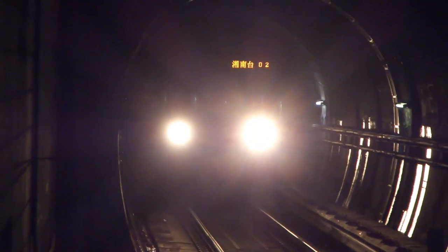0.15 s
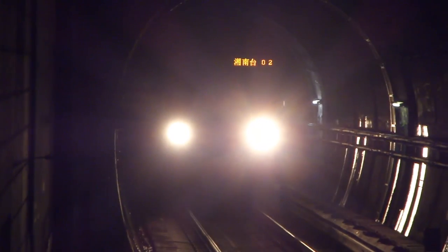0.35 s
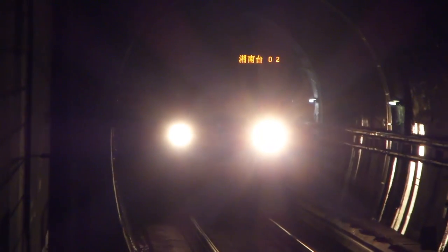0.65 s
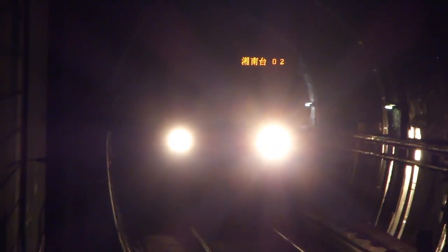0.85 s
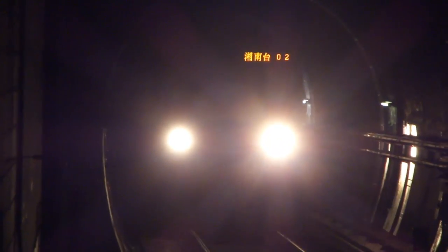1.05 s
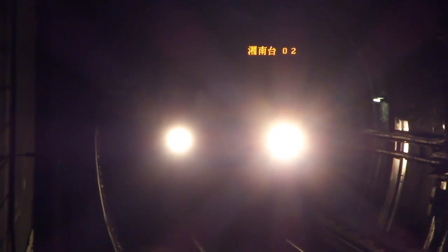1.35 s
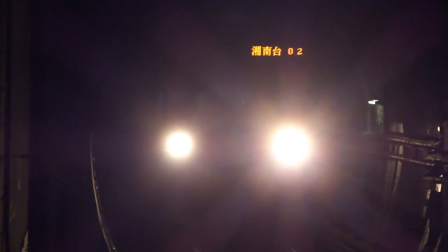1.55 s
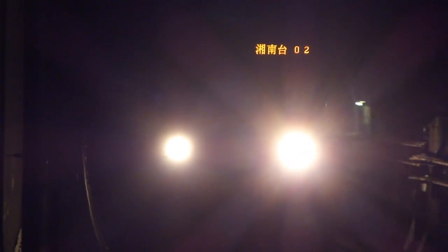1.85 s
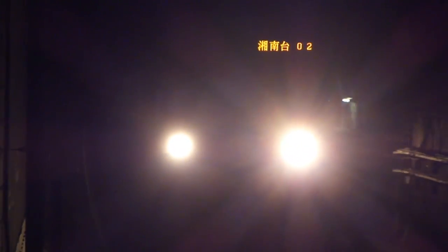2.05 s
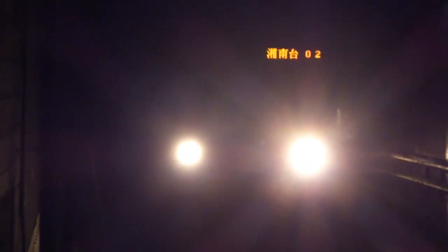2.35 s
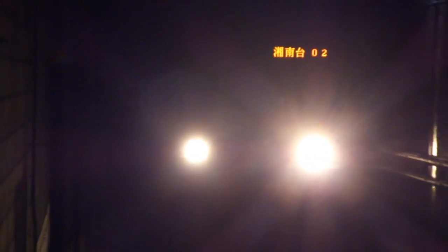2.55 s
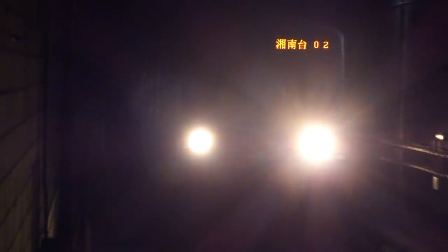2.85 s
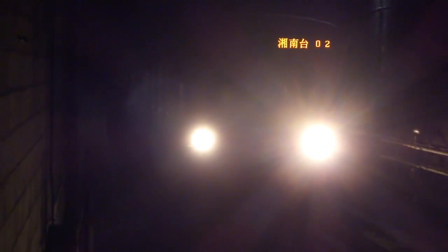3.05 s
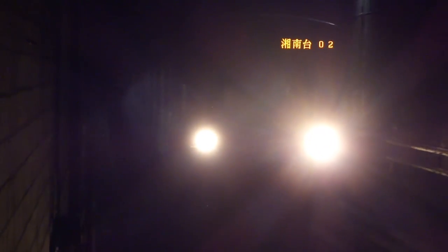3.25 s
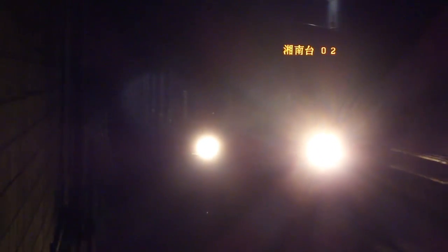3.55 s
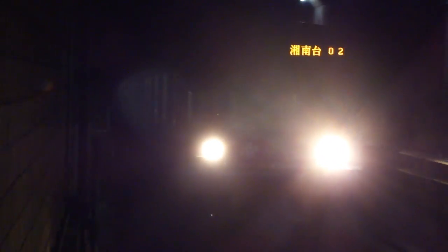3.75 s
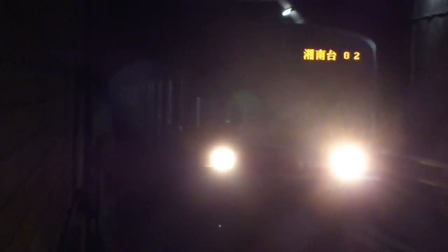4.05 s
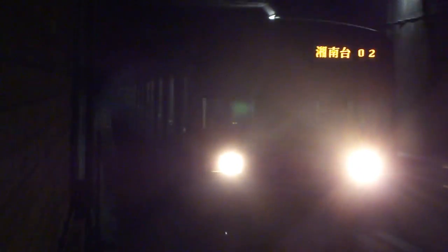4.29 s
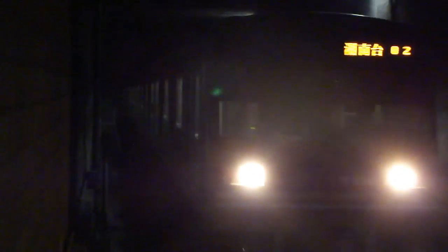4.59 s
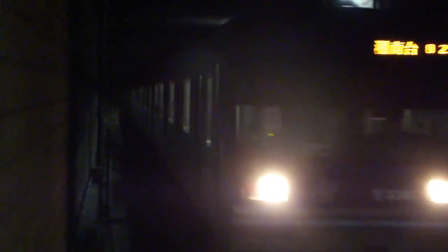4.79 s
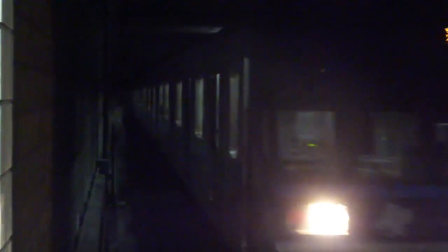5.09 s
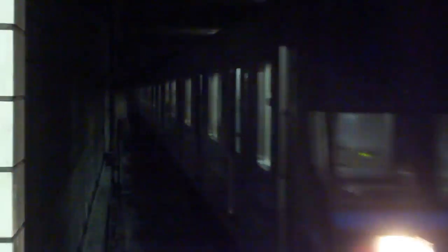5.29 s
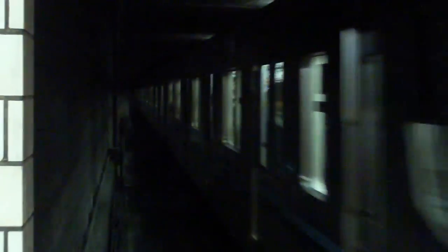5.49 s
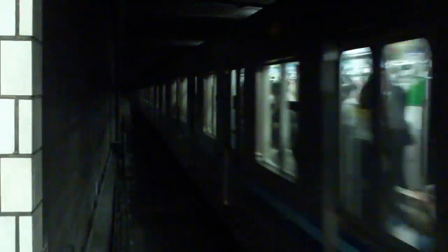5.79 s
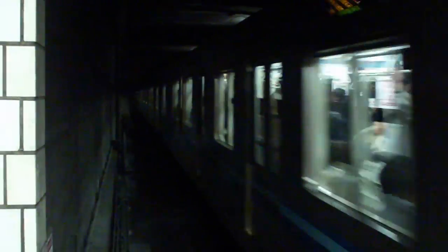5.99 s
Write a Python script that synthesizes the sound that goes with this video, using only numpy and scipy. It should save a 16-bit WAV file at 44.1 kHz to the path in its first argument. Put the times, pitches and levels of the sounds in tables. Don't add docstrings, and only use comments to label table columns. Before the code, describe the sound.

Hollow rumbling and humming of an approaching underground train, gusty wind thumps, growing metallic hiss and pulsing high wheel squeals close by at the end.

```python
import sys
import numpy as np
from scipy import signal
from scipy.fft import rfft, irfft, next_fast_len
from scipy.io import wavfile
from scipy.ndimage import uniform_filter1d

SR = 44100
rng = np.random.default_rng(int(sys.argv[2]) if len(sys.argv) > 2 else 0)


def linear_from_db(decibels):
    return 10 ** (np.asarray(decibels, float) / 20)


def store_pcm(level_fs):
    pcm = np.round(np.clip(level_fs, -1, 1) * 32767).astype(np.int16)
    wavfile.write(sys.argv[1], SR, np.atleast_2d(pcm).T)


N = 270333


def in_time(rows):
    s, *columns = np.transpose(rows)
    return [np.interp(np.arange(N) / SR, s, c) for c in columns]


def ramp(start_s, length_s):
    return np.clip((np.arange(N) / SR - start_s) / length_s, 0, 1)


def rms_one(x):
    return x / np.sqrt(np.mean(np.abs(x) ** 2) + 1e-20)


def drift(rate_hz):
    r = np.exp(-80 * np.pi * rate_hz / SR)
    noise = rng.standard_normal(N // 40 + 2002)
    slow = signal.lfilter([1], [1, -2 * r, r * r], noise)[2000:]
    return np.interp(np.arange(N) / 40, np.arange(len(slow)), rms_one(slow))


def coloured(spectrum, low_hz, high_hz, rings=()):
    size = next_fast_len(N)
    hz = np.arange(size // 2 + 1) * SR / size + 1e-3
    points = np.array(spectrum)
    gain = linear_from_db(np.interp(np.log(hz), np.log(points[:, 0]), points[:, 1]))
    resonance = sum(linear_from_db(db) ** 2 / (1 + (2 * (hz - f) / w) ** 2) for f, w, db in rings)
    gain = gain * np.sqrt(1 + resonance)
    gain = gain / np.sqrt((1 + (low_hz / hz) ** 10) * (1 + (hz / high_hz) ** 10))
    noise = rng.standard_normal((2, size))
    return rms_one(irfft(gain * rfft(noise), size)[:, :N])


def ringing(centre_hz, width_hz):
    r = np.exp(-np.pi * width_hz / SR)
    slow = rng.standard_normal((2, N)) + 1j * rng.standard_normal((2, N))
    slow = signal.lfilter([1], [1, -2 * r, r * r], slow)
    carrier = np.exp(2j * np.pi * np.cumsum(centre_hz) / SR)
    return rms_one(np.real(slow * carrier))


def stereo(pair, alike, left_db, left_lag):
    shared, walls = pair
    size = next_fast_len(N)
    spectrum = rfft(shared, size)
    delay = np.exp(-2j * np.pi * np.arange(len(spectrum)) / size * left_lag)
    late = irfft(spectrum * delay, size)[:N]
    alike = np.clip(alike, 0, 1)
    echoes = np.array([walls, np.roll(walls, 9000)])
    both = np.sqrt(alike) * np.array([late, shared]) + np.sqrt(1 - alike) * echoes
    return both * linear_from_db([[left_db / 2], [-left_db / 2]])


def in_bend():
    return ramp(3.45, .15) - ramp(4.78, .05)


def nearness_db():
    speed_m_per_s, abreast_s, side_m = 10.1, 5.98, 6.35
    along_m = speed_m_per_s * (np.arange(N) / SR - abreast_s)
    return -10 * np.log10(1 + (along_m / side_m) ** 2)


# (time [s], rail level [dB], wheel level over the rail [dB])
ROLLING = [(0, -21, -13), (.22, -18.5, -11.5), (.72, -17.5, -12.5), (.84, -20.5, -13), (1.05, -22, -10.5),
           (1.18, -18, -12.5), (1.5, -20, -11.5), (1.95, -18.5, -12.5), (2.45, -19.5, -13),
           (2.65, -19.5, -8), (3.28, -18.5, -12), (3.55, -19, -15), (3.82, -17.5, -12.5),
           (4.08, -17.5, -13), (4.35, -15.5, -9.5), (4.65, -25, -9), (4.9, -18, -10), (6.13, -18.5, -11.5)]
# (frequency [Hz], density [dB per Hz])
ROLLING_COLOUR = [(24, -82), (40, -57.5), (114, -25), (155, -28.5), (196, -15), (281, -16.5), (325, -10.5),
                  (397, -11), (802, -4.5), (1240, -12), (2130, -14), (2420, -15.5), (3000, -37),
                  (3900, -60), (6600, -120)]
# (frequency [Hz], width [Hz], level over the roar [dB])
RAIL_MODES = [(474.7, 4.8, 6.5), (648, 28, -8), (1090, 130, 0.5), (1882, 243, 4.5), (2380, 74, -8.5)]
# (time [s], centre [Hz], level over the rail band [dB])
RAIL_HUM = [(0, 800, -5), (.5, 845, -2.5), (.75, 800, 1), (1.3, 830, -5), (2.3, 826, -7), (2.55, 787, 0.5),
            (3.3, 783, -4), (3.6, 766, -2), (4.2, 772, -8), (4.5, 790.6, -0.5), (4.85, 816.8, -2.5),
            (5.25, 816, -6), (5.45, 793, -5.5), (5.9, 789.3, -8), (6.13, 822, -4)]


def roar():
    rail_db, wheel_db = in_time(ROLLING)
    hum_hz, hum_db = in_time(RAIL_HUM)
    together_db = 0.77 * drift(19.0)

    low_db = -26 + 0.48 * (rail_db - rail_db.mean()) - rail_db
    low = stereo(coloured(ROLLING_COLOUR, 110, 620, RAIL_MODES), alike=0.99, left_db=-3.5, left_lag=.8)
    low = low * linear_from_db(low_db + 0.32 * drift(1.8))

    rail = coloured(ROLLING_COLOUR, 474, 972, RAIL_MODES) * linear_from_db(-3.5 + 0.72 * drift(13))
    hum = ringing(hum_hz, width_hz=75) * linear_from_db(hum_db - 4.5 + 1.5 * drift(5))
    rail = stereo(rail + hum, alike=1.0, left_db=-3.5, left_lag=0.39)

    upper_db = -3 - 4.5 * ramp(3.33, 0.15)
    upper = stereo(coloured(ROLLING_COLOUR, 949, 1233, RAIL_MODES), alike=0.97, left_db=-4.5, left_lag=1.0)
    upper = upper * linear_from_db(upper_db + together_db + 1.0 * drift(8.2))

    wheel_db = wheel_db - 0.1 + 2 * ramp(5.15, 0.11)
    wheel = stereo(coloured(ROLLING_COLOUR, 1360, 4000, RAIL_MODES), alike=0.93, left_db=-5.0, left_lag=0.37)
    wheel = wheel * linear_from_db(wheel_db + together_db + 0.18 * drift(15))
    return linear_from_db(rail_db + 0.12) * (low + rail + upper + wheel)


def squeal(level_db, centre_hz, broad_hz, wander_hz, alike):
    sound = ringing(centre_hz, broad_hz)
    share_db = np.clip(.4 * (level_db - level_db.max()), -10, 0) - 6
    for rate_hz in (7, 11):
        whistle = ringing(centre_hz + wander_hz * drift(rate_hz), 200)
        sound = sound + whistle * linear_from_db(share_db + 3.5 * drift(14))
    return linear_from_db(level_db) * stereo(rms_one(sound), alike=alike, left_db=-.8, left_lag=1.4)


# (time [s], peak level [dB], starting pitch [Hz])
WHEEL_TURNS = [(2.509, -52, 7510), (2.69, -58, 7560), (2.87, -52, 7600), (3.04, -58, 7680),
               (4.905, -41.5, 7330), (5.1, -39.5, 7510), (5.305, -38.5, 7660), (5.505, -42, 7520),
               (5.71, -35.5, 7670), (5.911, -36, 7810), (6.11, -42.5, 7830)]


def wheel_turns(steady_db):
    rise_s, hold_s, fall_db_per_s, climb_hz_per_s = .015, 0.061, 125, 2000
    t = np.arange(N) / SR
    power = linear_from_db(2 * steady_db)
    hz = np.full(N, 7760.)
    for s, peak_db, start_hz in WHEEL_TURNS:
        fall_db = fall_db_per_s * np.maximum(t - s - hold_s, 0)
        power = power + (ramp(s - rise_s, rise_s) * linear_from_db(peak_db - fall_db)) ** 2
        during = (t > s - rise_s) & (t < s + .2)
        hz = np.where(during, start_hz + climb_hz_per_s * (t - s), hz)
    return 10 * np.log10(power), hz


# (time [s], level [dB])
FLANGE_PRESSURE = [(0.0, -54), (0.03, -64.5), (0.94, -64), (1.25, -54), (1.86, -55.5), (3.16, -44.5),
                   (3.45, -54), (4.46, -48), (4.71, -52), (4.8, -38.5), (5.0, -36.5), (5.16, -37),
                   (5.53, -37), (5.63, -31.5), (5.77, -38), (5.82, -32), (5.89, -35), (6.13, -34.5)]


def flanges():
    high_db, = in_time(FLANGE_PRESSURE)
    under_peak_db = high_db - high_db.max()
    bend = in_bend()
    high_hz = 9520 + (8780 - 9520) * bend
    low_db, low_hz = wheel_turns(-43 + under_peak_db + 2.9 * bend)
    low = ramp(1.8, 1.0) * squeal(low_db, low_hz, broad_hz=820, wander_hz=170, alike=.6)
    high = squeal(high_db + 0.41 + 1.3 * drift(12), high_hz, broad_hz=1370, wander_hz=286, alike=.45)
    over_db = high_db - 17.5 + 0.27 * under_peak_db + 8 * drift(6)
    over = linear_from_db(over_db) * ringing(np.full(N, 11000.), width_hz=500)
    return low + high + over


# (time [s], level [dB], pitch [Hz])
DISC_RING = [
    (0, -71, 2300),
    (5.05, -67.5, 2238),
    (5.2, -38, 2316),
    (5.35, -32.5, 2380),
    (5.48, -34, 2265),
    (5.65, -36, 2136),
    (5.8, -54, 1990),
    (6.13, -73, 2100),
]


def bogie():
    level_db, hz = in_time(DISC_RING)
    return linear_from_db(level_db) * stereo(ringing(hz, width_hz=230), alike=.9, left_db=-6.0, left_lag=.4)


# (frequency [Hz], density [dB per Hz])
SLIDING_COLOUR = [(2800, -7), (3300, -3), (4500, -5.5), (5600, -4), (6600, -1.5), (7600, -6), (8600, -11.5),
                  (10000, -10), (11500, -26)]


def hiss():
    near_db, wheel_db = nearness_db(), sum(in_time(ROLLING))
    level_db = wheel_db.mean() + 0.77 * (wheel_db - wheel_db.mean()) - 14.5
    level_db = level_db + 0.52 * near_db
    level_db = level_db + 1.7 * ramp(5.15, .12)
    level_db = level_db + 1.5 * in_bend()
    lower_db = -11 - 0.41 * near_db
    lower = stereo(coloured(SLIDING_COLOUR, 2300, 5100), alike=0.58, left_db=-3.5, left_lag=0.24)
    upper = stereo(coloured(SLIDING_COLOUR, 4670, 15000), alike=0.62, left_db=-0.2, left_lag=0.81)
    return linear_from_db(level_db + 1.1 * drift(8.9)) * (linear_from_db(lower_db + 5.0) * lower + linear_from_db(1.5) * upper)


# (time [s], peak level [dB], pitch [Hz], length [s])
FLANGE_CHIRPS = [
    (2.204, -77, 13500, 0.04),
    (2.577, -73, 13670, 0.04),
    (3.2695, -86, 13800, 0.038),
    (3.905, -78, 12700, 0.04),
    (4.7636, -74, 13300, 0.04),
    (5.596, -65, 13400, 0.032),
    (5.8052, -66, 13100, 0.051),
]


def chirps():
    t, out = np.arange(N) / SR, 0
    noise = ringing(np.zeros(N), width_hz=120)
    for s, peak_db, hz, length_s in FLANGE_CHIRPS:
        shape = np.sin(np.pi * np.clip((t - s + .01) / length_s, 0, 1)) ** 2
        out = out + linear_from_db(peak_db + 3.0) * shape * noise[0] * np.sin(2 * np.pi * hz * t)
    return out


# (middle [s], half length [s], peak level [dB], left over right [dB])
AIR_PUFFS = [(0, 0.056, -19, -3.5), (0.347, 0.066, -25.5, -7), (0.562, 0.054, -22, -4),
             (0.844, 0.09, -20.5, -6.5), (0.988, 0.038, -25.5, -9), (1.308, 0.014, -18.5, 0),
             (1.42, .045, -18, -3), (1.54, 0.046, -23, 0), (1.722, .04, -18, 4), (1.79, 0.029, -24, -2),
             (1.922, 0.06, -26.5, -3), (2.093, 0.043, -17.5, -2.5), (2.216, 0.038, -14.5, -1),
             (2.424, 0.059, -18, 0.5), (2.672, 0.13, -26.5, 2), (3.064, 0.13, -30, -10),
             (3.462, 0.11, -22, -5), (3.676, 0.24, -26.5, 0), (3.885, 0.025, -16, -2),
             (4.063, 0.14, -21.5, -0.5), (4.49, 0.088, -20.5, -3), (4.6, 0.11, -20, -1.5),
             (4.784, 0.088, -20, -7), (5.093, 0.035, -20, -10), (5.19, 0.12, -21.5, -4),
             (5.347, 0.077, -22.5, -10), (5.537, 0.05, -27, -5), (5.715, 0.02, -24, 2),
             (5.866, 0.054, -27.5, -4), (6.005, 0.053, -26, -4)]


def puffs():
    edge_db, skirt, lull_db = 5.5, 1.63, -40
    t = np.arange(0, N, 40) / SR
    s, half_s, peak_db, left_db = np.transpose(AIR_PUFFS)[:, :, None]
    power = linear_from_db(2 * (peak_db - edge_db * np.abs((t - s) / half_s) ** skirt))
    total = power.sum(axis=0) + linear_from_db(2 * lull_db)
    side_db = (power * left_db).sum(axis=0) / total
    return in_time(np.transpose([t, 10 * np.log10(total), side_db]))


# (frequency [Hz], density [dB per Hz])
TURBULENCE_COLOUR = [(18, -81), (30, -43), (137, -9), (220, -4.5), (380, -4), (580, -6), (800, -15),
                     (1200, -26.5), (2000, -43)]


def wind(level_db, left_db):
    lumps_db = np.array([1.9 * drift(35) + left_db / 2, 1.5 * drift(23) - left_db / 2])
    deep = coloured(TURBULENCE_COLOUR, 38, 363) * linear_from_db(0.8 * drift(24))
    bright = coloured(TURBULENCE_COLOUR, 240, 3000) * linear_from_db(0.27 * (level_db + 19.5))
    ports = (deep + bright) * linear_from_db(lumps_db + level_db - 5.0)
    return ports - .33 * ports[::-1]


def ducking(air_db):
    depth_db, threshold_db, release_s = 5, -23, 0.084
    r = np.exp(-1 / (release_s * SR))
    felt = signal.lfilter([1 - r], [1, -r], linear_from_db(2 * (air_db - threshold_db)))
    return linear_from_db(-depth_db * np.log10(1 + felt))


def scene():
    air_db, left_db = puffs()
    train = roar() + hiss() + flanges() + bogie()
    return ducking(air_db) * train + wind(air_db, left_db)


# (time [s], click peak level [dB])
INPUT_OVERLOADS = [(.238, -48), (.6727, -46), (.7167, -46), (1.1937, -45), (1.3987, -40), (1.5532, -43),
                   (1.7117, -47), (2.0717, -40), (2.2031, -38), (3.2748, -33), (3.8674, -38), (4.3897, -41),
                   (5.3027, -48), (5.4007, -40)]


def gain_cuts(x):
    cusp_s, cusp_db, cut_db, recovers_s = 6e-5, 18, 2.5, .04
    gain_db, cusps, t = np.zeros(N), np.zeros(N), np.arange(-400, 8000) / SR
    for s, click_db in INPUT_OVERLOADS:
        at = slice(round(s * SR) - 400, round(s * SR) + 8000)
        cusps[at] += linear_from_db(click_db + cusp_db) * np.exp(-np.abs(t) / cusp_s)
        recovery = np.clip(t / .002, 0, 1) * np.exp(-np.abs(t) / recovers_s)
        gain_db[at] -= cut_db * linear_from_db((click_db + 33) / 2) * recovery
    return x * linear_from_db(gain_db) + uniform_filter1d(cusps, size=5) * linear_from_db([[-2], [2]])


def masked_out(x):
    mask_db, floor_db, floor_follows = -5, -35, .7
    hz, t, z = signal.stft(x, SR, nperseg=1536, noverlap=768)
    bands = len(hz) // 4
    centre = hz[2::4][:bands, None]
    power = (np.abs(z[:, :bands * 4]) ** 2).reshape(2, bands, 4, -1).mean(axis=(0, 2))
    power = uniform_filter1d(power, size=2, axis=1) + 1e-20
    limit = 3 * power[bands * 3400 * 2 // SR]
    around = uniform_filter1d(np.minimum(power, limit), size=9, axis=0)
    treble = (centre[:, 0] > 8500) & (centre[:, 0] < 10000)
    treble_db = 10 * np.log10(power[treble]).mean(axis=0)
    spare_db = uniform_filter1d(rng.normal(0, 7, power.shape), size=3, axis=1)
    notch = (centre > 2900) & (centre < 5400) & (power < around * linear_from_db(2 * mask_db + spare_db))
    pairs = np.repeat(power[::2] + power[1::2], 2, axis=0) / 2
    top_db = floor_db + floor_follows * treble_db + 1.6 * spare_db[0]
    top = (centre > 10200) & (pairs < linear_from_db(2 * top_db))
    z[:, :bands * 4] *= np.repeat(~(notch | top), 4, axis=0)
    return signal.istft(z, SR, nperseg=1536, noverlap=768)[1][:, :N]


# (frequency [Hz], width [Hz])
MOTOR_NOTCHES = [(2984, 235), (3978, 450), (4940, 420), (4180, 84), (5145, 150)]


def motor_filter(x):
    for hz, width_hz in MOTOR_NOTCHES:
        x = .9 * signal.lfilter(*signal.iirnotch(hz, hz / width_hz, SR), x) + .1 * x
    return x


def roll_off(x):
    return signal.sosfilt(signal.butter(12, 14000, fs=SR, output="sos"), x)


def record(dry):
    x = signal.sosfilt(signal.butter(8, 10600, fs=SR, output="sos"), dry)
    x = 1.72 * np.tanh(x / 1.486)
    x = masked_out(gain_cuts(motor_filter(x))) + chirps()
    x = x * np.clip((N - np.arange(N)) / 80, 0, 1)
    return roll_off(x)


dry = scene()
out = record(dry)
store_pcm(out)
```